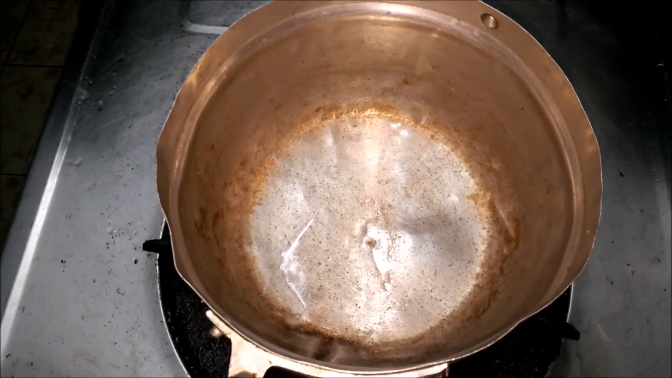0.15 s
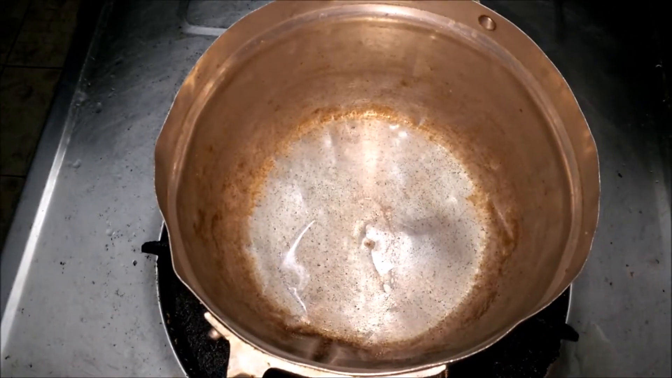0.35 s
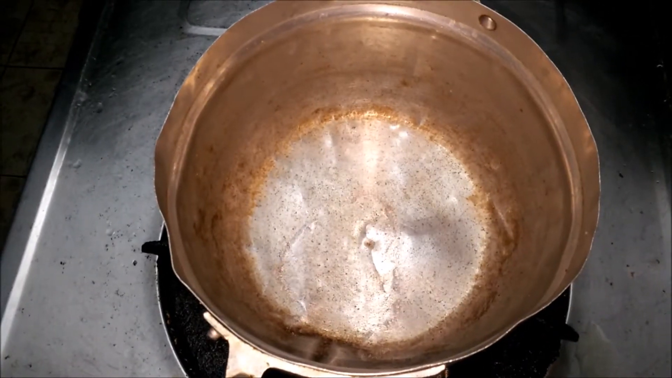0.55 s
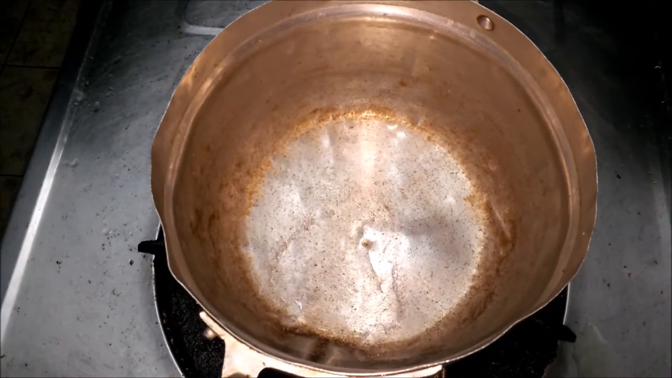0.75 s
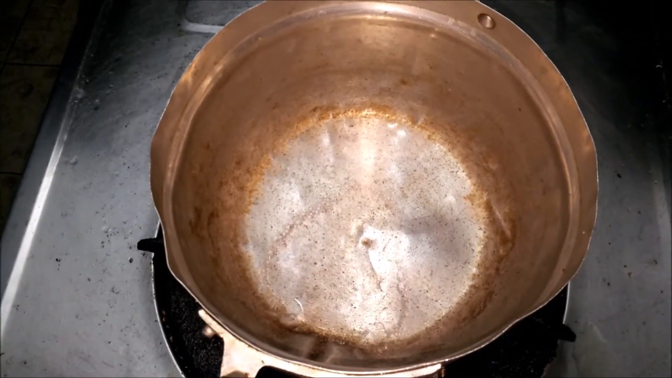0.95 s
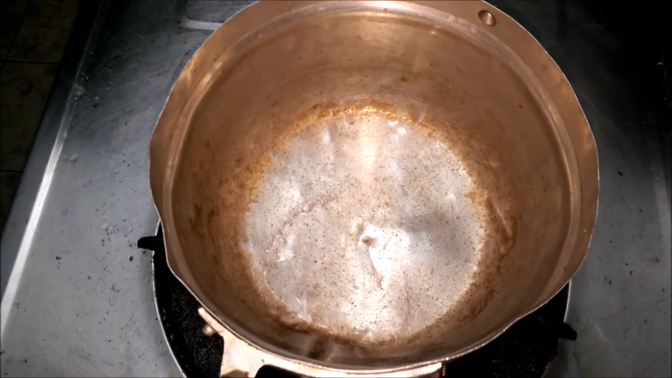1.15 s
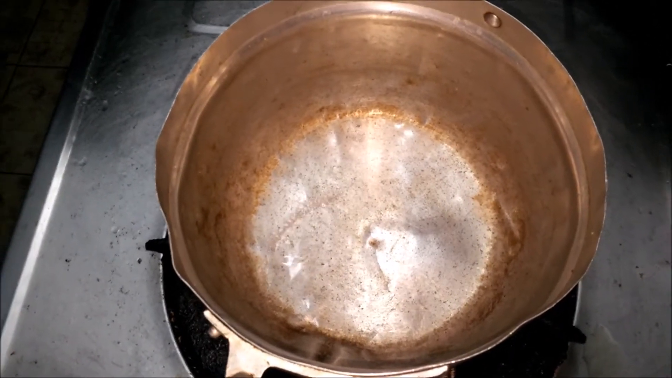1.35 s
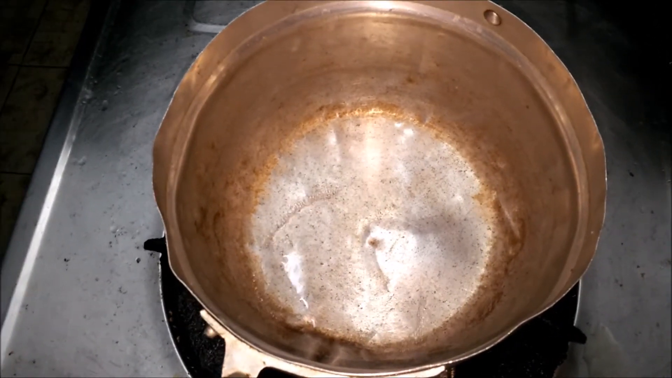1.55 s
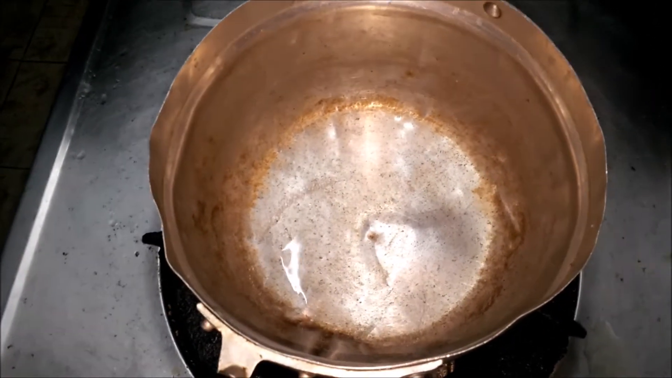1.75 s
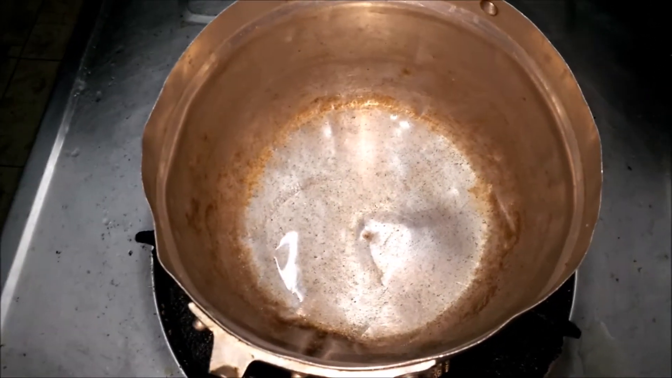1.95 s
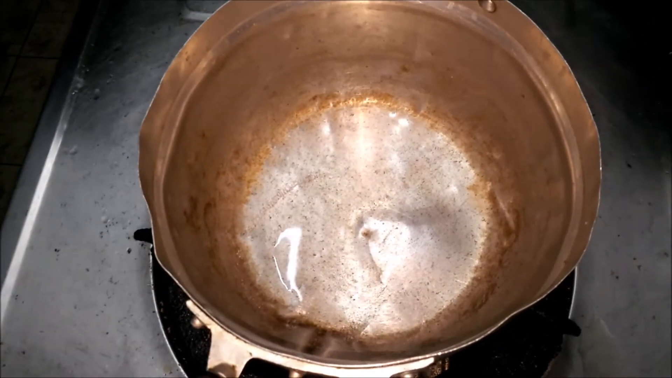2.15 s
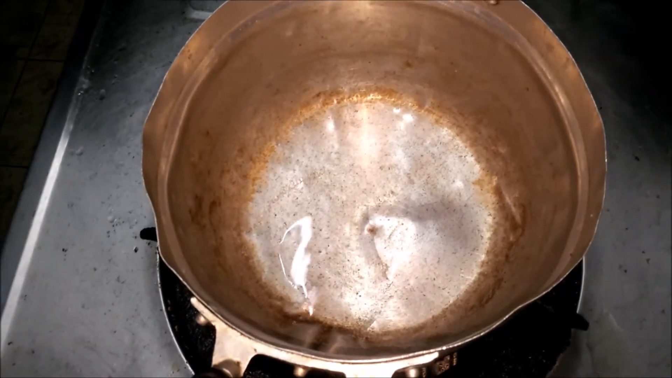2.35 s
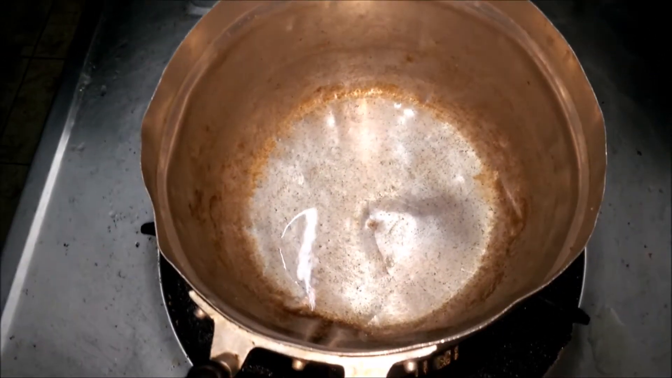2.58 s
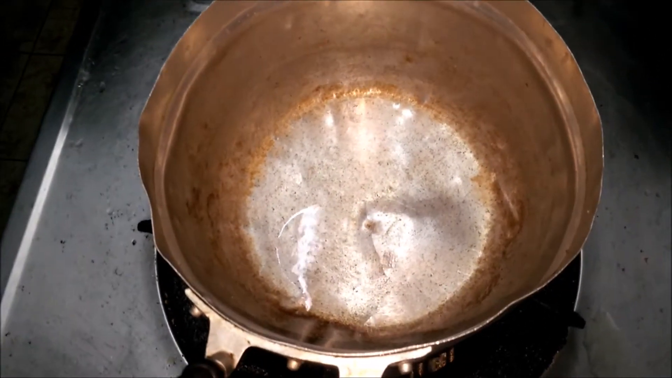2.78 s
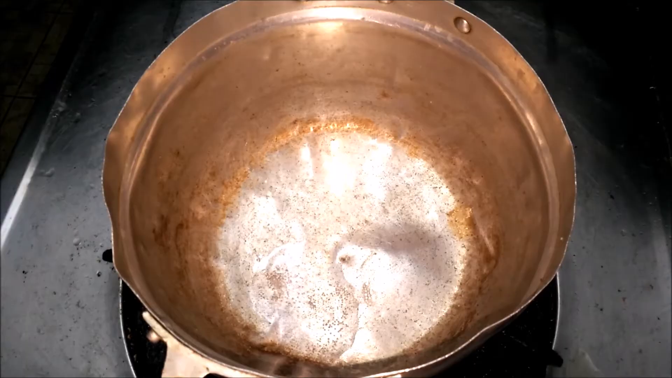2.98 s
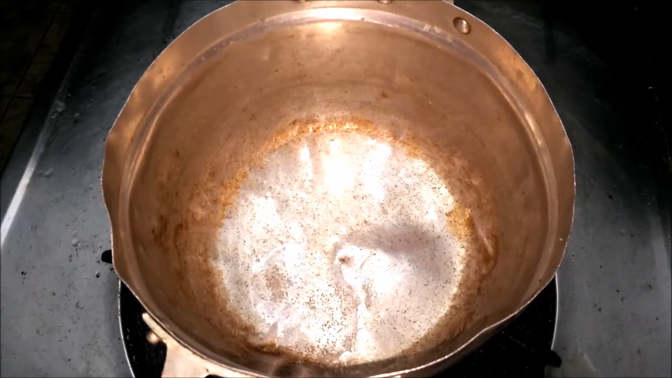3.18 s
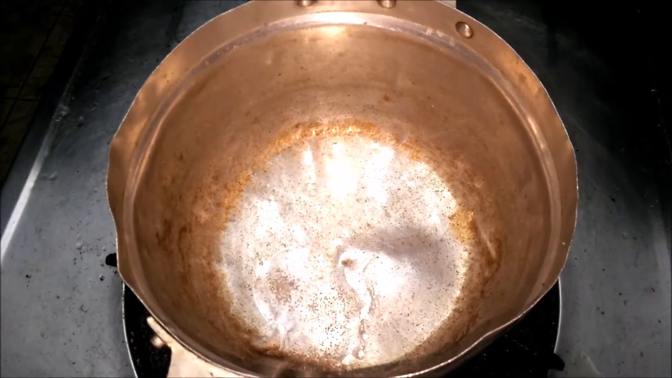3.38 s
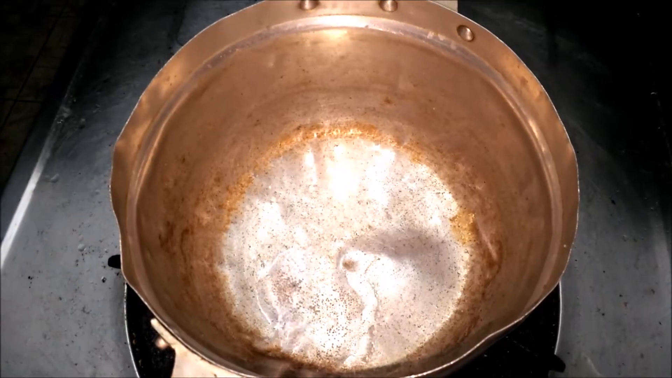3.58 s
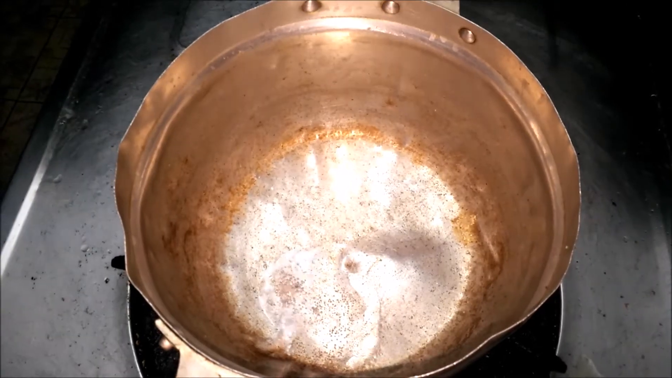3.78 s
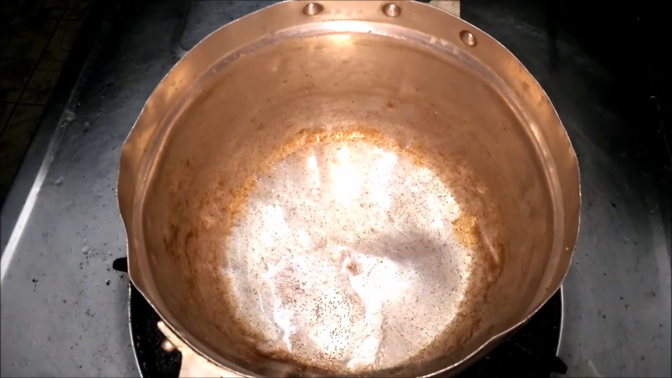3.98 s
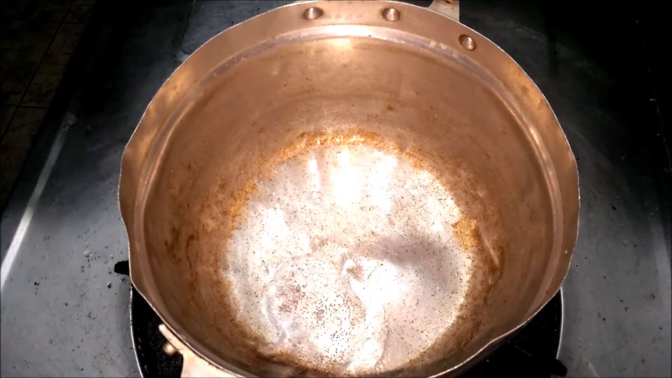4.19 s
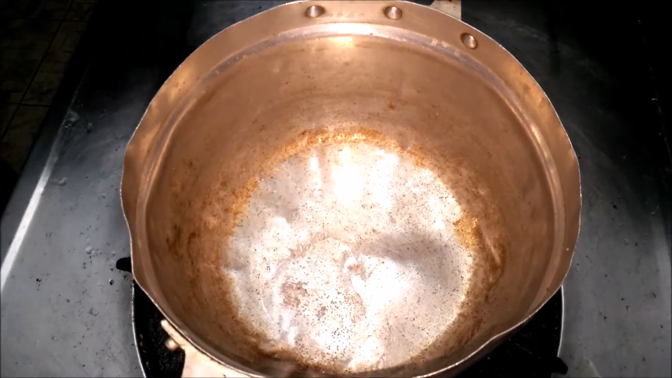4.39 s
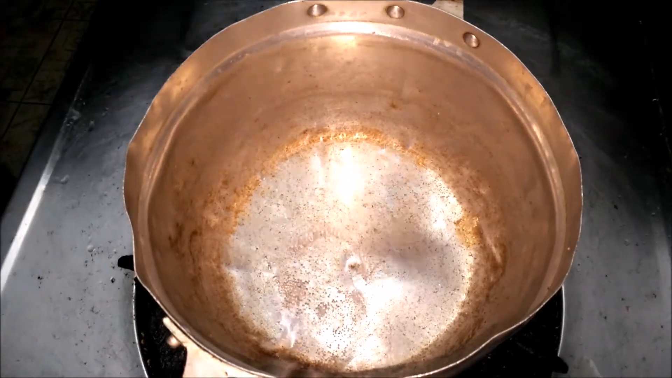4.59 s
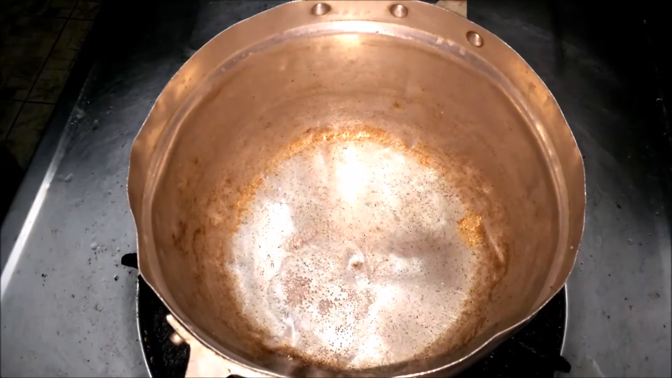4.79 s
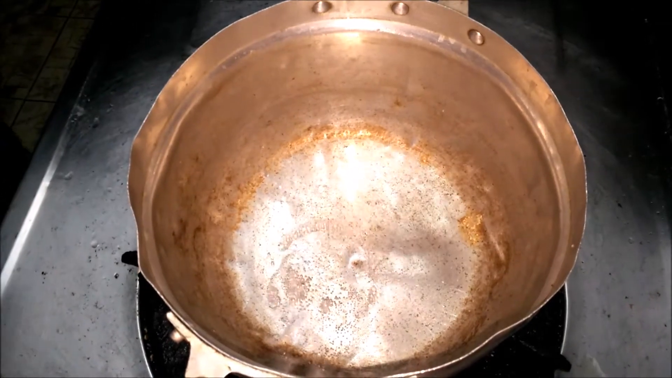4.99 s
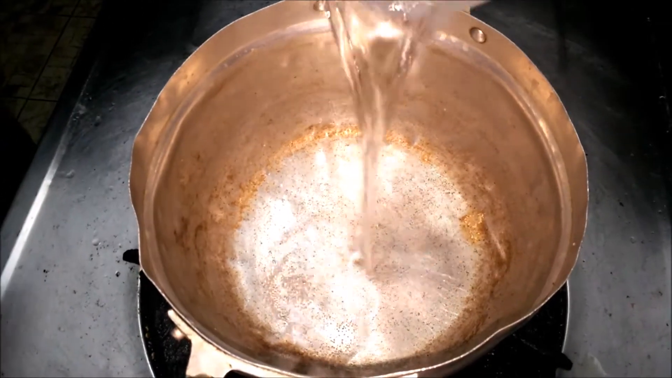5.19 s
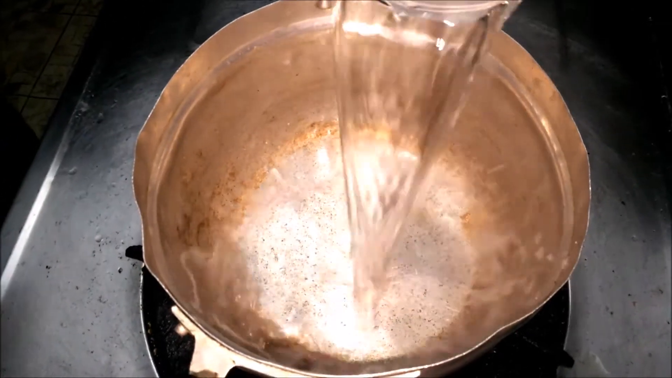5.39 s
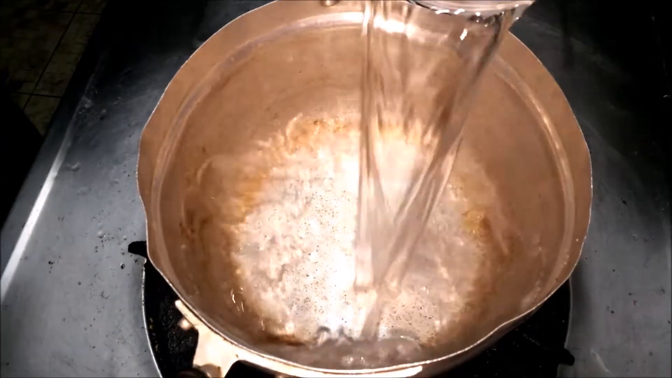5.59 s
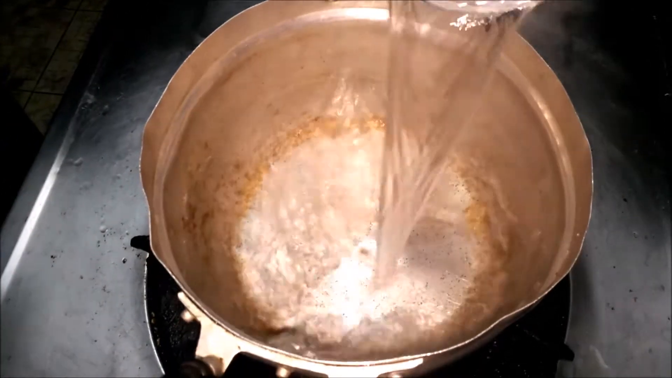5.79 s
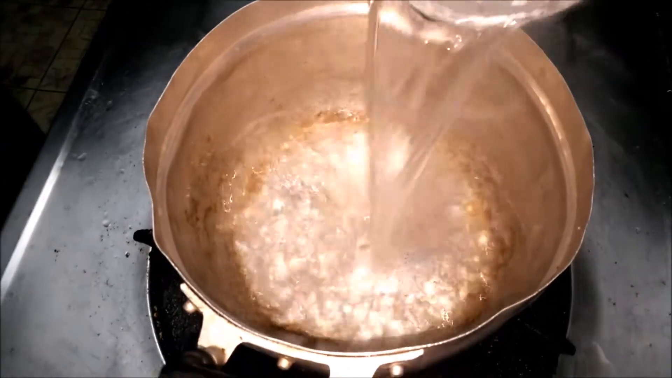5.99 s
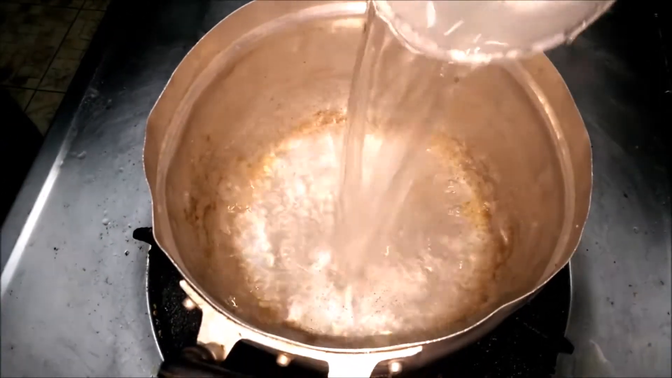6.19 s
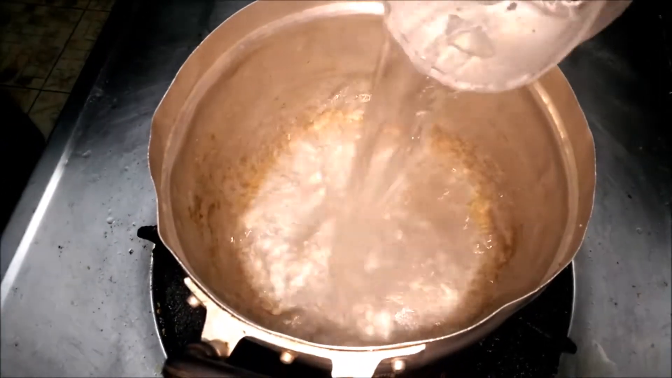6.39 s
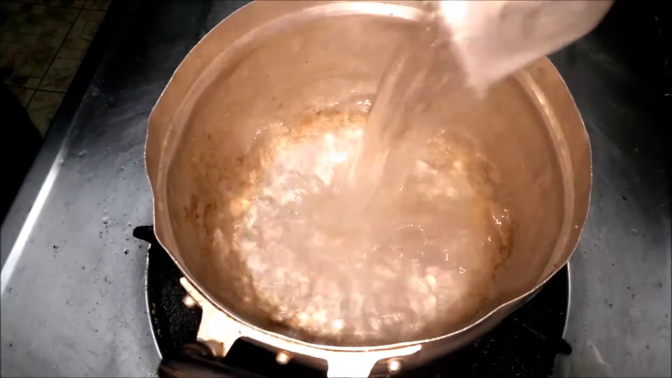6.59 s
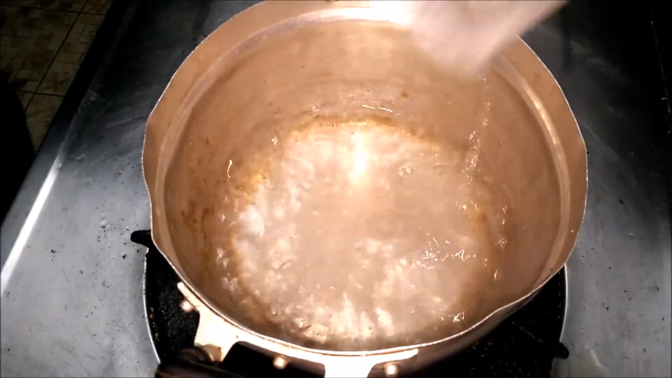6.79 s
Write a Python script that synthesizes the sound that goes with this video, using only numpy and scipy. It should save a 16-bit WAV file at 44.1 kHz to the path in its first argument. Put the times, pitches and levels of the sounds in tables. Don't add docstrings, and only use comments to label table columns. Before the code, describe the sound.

Sharp oil pops over fine sizzling in a thin pot, a quiet lull, then a sudden overloaded blast of steam that settles into bubbling.

```python
import sys
import numpy as np
from scipy import signal
from scipy.fft import rfft, irfft, next_fast_len
from scipy.io import wavfile
from scipy.ndimage import uniform_filter1d, map_coordinates

SR = 44100
rng = np.random.default_rng(int(sys.argv[2]) if len(sys.argv) > 2 else 0)


def amp(db):
    return 10 ** (np.asarray(db, float) / 20)


def write(x):
    x = np.atleast_2d(x).T
    wavfile.write(sys.argv[1], SR, np.round(np.clip(x, -1, 1) * 32767).astype(np.int16))


N = 301930
GRID = 32

# time in seconds, level in dB.
FLAME = [(0, -85), (1.7, -84), (2.1, -87), (3.4, -80), (4.5, -75), (4.75, -80), (5.2, -77), (6.1, -84),
         (6.85, -69)]
# time in seconds, peak level in dB.
GUSTS = [(0, -87), (.6, -89), (1.06, -92), (1.31, -93), (1.88, -94), (3.48, -88), (4.18, -85), (4.61, -84),
         (4.99, -84), (6.53, -77), (6.85, -79)]
# time in seconds, level in dB.
BLAST = [
    (5.22, -95),
    (5.232, -61),
    (5.45, -51),
    (5.64, -54),
    (5.8, -66),
    (5.95, -90),
]
STILL_DB, GUST_RISE_S, GUST_FALL_S, BLAST_DRAUGHT_DB = -104, .12, .1, -4.5
# start in seconds, peak in dB, pitch in Hz, 60 dB decay in seconds.
KNOCKS = [
    (3.965, -56, 260, .08),
    (3.96, -41, 584, 0.056),
    (4.05, -50, 300, 0.066),
    (4.14, -62, 88, .08),
    (4.19, -60, 90, .08),
    (4.98, -57, 110, 0.052),
]

# start in seconds, peak in dB, pitch in Hz, 60 dB decay in seconds.
BUBBLES = [(5.229, -23, 622, 0.05), (5.258, -24, 640, 0.06), (6.06, -35, 1470, 0.03), (5.85, -42, 660, .06),
           (6.055, -44, 680, .07), (6.09, -47, 620, .07), (6.13, -44, 1420, .04), (6.175, -39, 1550, .04),
           (6.3, -25.5, 3020, 0.019), (6.327, -30, 1500, 0.027), (6.33, -36, 2600, .03),
           (6.347, -39, 1440, .04), (6.405, -44, 3400, 0.052), (6.432, -49, 1900, 0.034),
           (6.458, -35, 2950, .03), (6.505, -42, 718, 0.056), (6.624, -44, 2690, 0.023),
           (6.657, -39, 3580, 0.028), (6.765, -39, 690, 0.041), (6.835, -32, 3480, 0.025)]
# start in seconds, peak in dB.
SPLASHES = [(3.8277, -28), (6.3521, -29), (6.3537, -28), (6.4364, -22), (6.4432, -26), (6.4451, -29),
            (6.5672, -25), (6.5885, -27), (6.606, -29), (6.688, -25), (6.6935, -26), (6.7075, -22),
            (6.719, -23), (6.75, -17.5), (6.7585, -18), (6.7665, -20), (6.8148, -13), (6.8175, -17),
            (6.826, -19), (6.8408, -9), (6.8435, -15)]
SPLASH_HZ, SPLASH_WIDTH_HZ, SPLASH_T60_S, SPLASH_RISE_S = 8000, 2000, .018, .0005

# start in seconds, peak in dB, low thud in dB, middle crack in dB, left-right in dB.
POPS = [(0.005, -14, -27, -24, -8), (0.0084, -20, -25, -19, -5), (0.0392, -10, -14, -12, -4),
        (0.0704, -15, -23, -15, -14), (0.2904, -16, -22, -20, -7), (0.306, -14.5, -16, -12, -5),
        (0.3853, -9, -21, -16, -11), (0.4254, -4.5, -24, -24, -3), (0.4305, -15, -12, -19, 0),
        (0.5511, -11.5, -20, -19, -5), (0.6285, -22, -15, -10, 3), (0.8767, -22, -15, -15, 1),
        (0.9135, -11.5, -26, -26, -3), (0.9187, -11, -28, -26, -4), (0.9475, -22, -26, -26, 4),
        (0.9937, -19, -25, -25, -7), (1.0159, -17, -21, -21, 1), (1.0178, -4.5, -30, -23, 7),
        (1.3475, -13, -17, -5, 3), (1.3982, -27, -10, -9, -1), (1.5422, -12, -26, -24, -4),
        (1.8815, -12, -16, -25, -17), (1.9139, -12, -27, -31, -8), (1.9452, -18, -24, -26, -11),
        (1.9674, -22, -24, -33, -4), (1.988, -16, -32, -38, -11), (2.2108, -23, -24, -35, -6),
        (2.3658, -11, -33, -26, -7), (2.4176, -20, -34, -18, -4)]
# start in seconds, peak in dB.
SPITS = [(0.1216, -21), (0.215, -25), (0.4585, -21), (0.5384, -20), (0.558, -20), (.675, -24),
         (1.0082, -23), (1.0809, -24), (1.5102, -31), (1.5279, -30), (1.8115, -31), (1.8329, -26),
         (1.9234, -23), (2.1533, -26), (2.197, -32), (2.2874, -23), (2.3055, -29), (2.3502, -35),
         (2.3636, -28), (2.5202, -34)]
SPIT_THUD_DB, SPIT_PAN_DB = -24, -5
SNAP_DB, SNAP_PER_DB, SNAP_DB_PER_S = -13, -.25, 3.2
# delay in seconds, level in dB.
ECHOES = [
    (.002, -9),
    (.0032, -16),
    (.0048, -18),
]
AFTER_DB, AFTER_STEAM_DB, AFTER_BRIGHT_DB, AFTER_RISE_S, AFTER_FALL_S = -30.5, -28, 1.5, .012, .16

# time in seconds, boiling in dB, steam in dB, fineness of the spray in dB.
FRY = [(0, -35, -57, -7), (.27, -40, -59, -5), (.87, -42, -59, -6), (1.1, -40, -58, -5),
       (1.34, -45, -62, -6), (1.87, -45, -62, -4), (2.3, -47.5, -65, -3), (2.6, -58, -67, -8),
       (3.12, -56, -65, -7), (3.55, -49.5, -57, -4), (3.9, -42, -57, -5), (4.1, -39.5, -57.5, -5),
       (4.43, -43, -58, -4.5), (4.85, -41, -59, -9), (5.2, -43, -58, -6), (6.05, -47, -58, -5),
       (6.3, -49, -58, -11), (6.68, -58, -61, -9)]
# peak in seconds, boiling in dB, steam in dB,
# 10 dB rise in seconds, 10 dB fall in seconds.
SURGES = [(.68, -40, -62, .1, .14), (1.39, -39.5, -60, .04, .14), (1.835, -42, -62, .02, .03),
          (2.7, -49, -67, .03, .1), (2.93, -50, -66, .06, .09), (3.025, -45, -66, .03, .02),
          (3.28, -40, -50, .08, .1), (3.41, -47, -59, .04, .1), (3.81, -44, -64, .08, .06),
          (3.95, -48, -57, .2, .4), (4.497, -39, -45, .04, .035), (4.68, -39, -62, .2, .07),
          (5.7, -40, -33.5, .3, .07), (5.235, -21.5, -55, .003, .022), (6.01, -26.5, -48, .06, .085),
          (6.348, -40, -50, .09, .05), (6.415, -44, -60, .008, .04), (6.44, -38.5, -52, .015, .14),
          (6.59, -37, -60, .05, .05), (6.69, -34, -52, .004, .16), (6.765, -29, -53, .06, .04),
          (6.85, -27, -54, .04, .05)]
# time in seconds, boiling in dB, steam in dB.
POUR = [
    (5.225, -70, -80),
    (5.24, -25, -51),
    (5.27, -25.5, -47),
    (5.305, -12.5, -37),
    (5.36, -13.5, -28),
    (5.76, -13.5, -28.5),
    (5.875, -29, -45),
    (5.95, -37, -45),
    (6.2, -70, -62),
]
# time in seconds, level in dB under steam.
FROTH = [(0, -4), (2.9, -5), (3.15, 2), (3.55, -7), (3.95, -1), (5.2, -1), (6.05, -2), (6.4, -6),
         (6.85, -7)]
# time in seconds, lift of its top in dB.
SHEEN = [(6.36, 0), (6.41, 6), (6.5, 4), (6.6, -2), (6.675, -5), (6.7, 2), (6.85, 2)]
# time in seconds, level in dB over the fizz.
FOCUS = [(0, -9), (2.6, -9), (3.6, -5), (4.0, 0), (4.5, 0), (4.8, 4), (5.2, 3), (5.3, -12), (6.0, -8),
         (6.5, 0), (6.85, 1)]
FOCUS_HZ, FOCUS_WIDTH_HZ = 8050, 1300
# time in seconds, left-right in dB.
DRIFT = [(0, -3), (1.2, 3.5), (1.75, 2.5), (1.91, 8), (2.4, 3), (3.09, 5.5), (3.53, -7), (3.97, 1.5),
         (4.48, -.5), (4.71, 9), (5.0, 15.5), (5.19, 2.5), (6.14, 0), (6.85, 5)]
STEAM_PAN_DB, STEAM_FOLLOWS = 5.3, -.15
POUR_BRIGHT_DB = -8.5
SURGE_HUM_DB, POUR_HUM_DB = -8, -14.5
PUFF_HZ = 3600

# frequency in Hz, level in dB per Hz.
FIZZ_COLOUR = [(2650, -64), (4500, -15), (6290, -9.5), (7260, -3), (7510, -1), (8200, 1.5), (10100, -4),
               (13400, -10), (13900, -10.5), (14600, -24)]
STEAM_COLOUR = [(500, -29), (1100, -10.5), (1800, 0), (3000, 0), (3800, 0.5), (5000, -14.5), (8000, -47.5)]
HUM_COLOUR = [(200, -25.5), (420, -18), (560, -10), (900, -7.5), (1300, -11), (2000, -55.5)]
RUMBLE_COLOUR = [(40, -49), (90, -16.5), (150, -5), (280, -2), (450, -7), (600, -33), (1000, -81)]
DRAUGHT_COLOUR = [(15, -22), (30, 7), (70, 9), (120, 12), (200, -60)]
# frequency in Hz, width in Hz, lift in dB.
POT = [(640, 210, 11), (1385, 170, 11.5), (2162, 240, 3), (2814, 690, 3), (3740, 300, 3.5),
       (4720, 500, 0.5), (5420, 260, 2.5), (5970, 260, 2.5), (6420, 220, 2.5)]
# frequency in Hz, width in Hz, gain in dB.
NULLS = [
    (3220, 120, -2.5),
    (4300, 200, -3),
]
# frequency in Hz, left-right in dB.
PORTS = [(60, -23), (92, -8), (140, 3), (210, -9), (320, 5), (500, -8), (760, -1), (1150, -5), (1760, -5),
         (2680, -13), (4090, -7.5), (6240, 7.5), (9510, 6), (14500, -4.5)]
# frequency in Hz, left-right correlation.
ALIKE = [(60, 0.39), (150, 0.55), (370, 0.65), (600, .75), (930, 0.8), (1400, .6), (2330, 0.15),
         (5810, 0.2), (14500, -0.05)]
LAG = 5


def unit(x):
    return x / np.sqrt(np.mean(x ** 2) + 1e-20)


def along(points, hz):
    f, v = np.transpose(points)
    return np.interp(np.log(hz + 1), np.log(f + 1), v)


def coloured(points, hz):
    return amp(along(points, hz))


def below(edge, slope, hz):
    return 1 / (1 + (hz / edge) ** slope)


def above(edge, slope, hz):
    return 1 / (1 + (edge / (hz + 1)) ** slope)


def around(centre, width, hz):
    return 1 / (1 + (2 * (hz - centre) / width) ** 4)


def lifted(modes, hz):
    return amp(sum(db / (1 + (2 * (hz - c) / w) ** 2) for c, w, db in modes))


def pot(hz):
    return lifted(POT, hz)


def filtered(x, gain, size=8192):
    cepstrum = irfft(np.log(gain(np.fft.rfftfreq(size, 1 / SR)) + 1e-6), size)
    cepstrum[..., 1:size // 2] *= 2
    cepstrum[..., size // 2 + 1:] = 0
    response = irfft(np.exp(rfft(cepstrum)), size)
    m = next_fast_len(x.shape[-1] + size)
    return irfft(rfft(x, m) * rfft(response, m), m)[..., :N]


def peaked(gain):
    click = filtered(1. * (np.arange(SR // 20) == 0), gain)[:SR // 20]
    return click / np.abs(click).max()


def grid_s():
    return np.arange(0, N + GRID, GRID) / SR


def curves(rows):
    s, *cols = np.transpose(rows)
    return [np.interp(grid_s(), s, c) for c in cols]


def fine(*controls):
    return [np.interp(np.arange(N) / SR, grid_s(), c) for c in controls]


def wobble(rate):
    knots = rng.standard_normal(int(N * rate / SR) + 4)
    return fine(map_coordinates(knots, [grid_s() * rate]))[0]


def swell(s, db, rise_s, fall_s):
    t = grid_s() - s
    return db - 10 * np.maximum(-t / max(rise_s, 1 / SR), t / fall_s)


def summed(*levels_db):
    return 10 * np.log10(sum(amp(db) ** 2 for db in levels_db) + 1e-20)


def sides(pan_db):
    return amp(np.array([pan_db / 2, -pan_db / 2]))


def ports(direct, apart):
    m = next_fast_len(N)
    hz = np.fft.rfftfreq(m, 1 / SR)
    share = np.clip(along(ALIKE, hz), 0, 1)
    late = np.exp(-1j * np.pi * hz * LAG / SR * np.array([[1], [-1]]))
    spectrum = rfft(direct, m) * late * share ** .5 + rfft(apart, m) * (1 - share) ** .5
    return irfft(spectrum, m)[:, :N]


def hiss(spiky_db, patchy_db):
    size = uniform_filter1d(amp(spiky_db * rng.exponential(size=N)), size=12)
    z = signal.stft(size * rng.standard_normal((3, N)), nperseg=256)[2]
    patches = uniform_filter1d(rng.standard_normal(z.shape[1:]), size=8, axis=0)
    patches = unit(uniform_filter1d(patches, size=12, axis=1))
    a = signal.istft(z * amp(patchy_db * patches), nperseg=256)[1][:, :N]
    return ports(a[0], a[1:])


def rings(table, rise, rough=0):
    out, t = np.zeros(N + SR), np.arange(SR // 12) / SR
    for s, db, hz, t60 in table:
        phase = 2 * np.pi * hz * (t + rise * t * t / t60)
        phase += rough * np.cumsum(rng.standard_normal(len(t)))
        envelope = amp(db - 60 * t / t60) * (1 - np.exp(-t / 0.0016))
        out[round(s * SR):][:len(t)] += envelope * np.sin(phase)
    return out[:N]


def flame():
    blast_db, = curves(BLAST)
    roar_db = summed(*curves(FLAME), blast_db)
    gusts_db = [swell(s, db, GUST_RISE_S, GUST_FALL_S) for s, db in GUSTS]
    draught_db = summed(STILL_DB, blast_db + BLAST_DRAUGHT_DB, *gusts_db)
    roar_db, draught_db = fine(roar_db, draught_db)
    shared, *apart = rng.standard_normal((3, N))
    roar = ports(shared, np.array(apart))
    rumble = unit(filtered(roar, lambda hz: coloured(RUMBLE_COLOUR, hz)))
    deep = unit(filtered(rng.standard_normal((2, N)), lambda hz: coloured(DRAUGHT_COLOUR, hz)))
    rumble = amp(roar_db + 3.5 + 1.7 * wobble(11)) * rumble
    return rumble + amp(draught_db - 1 + 5 * wobble(11)) * deep


def knocks():
    return rings(KNOCKS, rise=0)


def gurgle(count=110):
    u = rng.random((count, 3))
    start_s, peak_db = 5.86 + .98 * u[:, 0], 6 - 14 * u[:, 2]
    hz = 1300 * 3.24 ** u[:, 1]
    tones = rings(np.c_[start_s, peak_db, hz, 45 / hz], rise=0.091)
    return ports(tones, tones * np.ones((2, 1)))


def bubbles():
    tones = rings(BUBBLES, rise=0.05, rough=.05)
    return ports(tones, tones * np.ones((2, 1)))


def splashes():
    out, t = np.zeros((2, N + SR)), np.arange(SR // 40) / SR
    shape = amp(-60 * t / SPLASH_T60_S) * (1 - np.exp(-t / SPLASH_RISE_S))
    band = peaked(lambda hz: around(SPLASH_HZ, SPLASH_WIDTH_HZ, hz))
    for s, db in SPLASHES:
        ring = signal.fftconvolve(shape * rng.standard_normal((2, len(t))), band[None], axes=1)
        ring /= np.abs(ring).max(axis=1, keepdims=True)
        ring *= amp(db + 2.5) * sides(-0.5)[:, None]
        out[:, round(s * SR):][:, :ring.shape[1]] += ring
    return out[:, :N]


def droplets():
    oil = POPS + [(s, db, SPIT_THUD_DB, SPIT_THUD_DB, SPIT_PAN_DB) for s, db in SPITS]
    return [(s, db, thud_db, crack_db, SNAP_DB + SNAP_PER_DB * db + SNAP_DB_PER_S * s, pan_db)
            for s, db, thud_db, crack_db, pan_db in oil]


def pops():
    out, t = np.zeros((2, N + SR)), np.arange(SR // 20) / SR
    core = peaked(lambda hz: coloured(FIZZ_COLOUR, hz) * below(10500, 12, hz))
    thud = peaked(lambda hz: pot(hz) ** .6 * above(700, 4, hz) * below(2700, 6, hz))
    middle = peaked(lambda hz: pot(hz) * above(2900, 6, hz) * below(6000, 8, hz))
    snap = peaked(lambda hz: above(10500, 12, hz) * below(14300, 40, hz))
    for s, db, thud_db, crack_db, snap_db, pan_db in droplets():
        noise = rng.standard_normal((3, len(t)))
        crack = (t == 0) + .12 * noise[0] * amp(-60 * t / .004)
        pair = np.array([np.pad(crack, (LAG, 0))[:len(t)], crack])
        ears = sides(pan_db - 4.5)
        pair *= (ears / ears.mean())[:, None]
        pair += noise[1:] * (amp(-23.5 - 60 * t / .018) + amp(-33 - 60 * t / .08))
        for lag, echo_db in ECHOES:
            k = round(lag * SR * rng.uniform(.92, 1.08))
            echo = amp(echo_db + rng.normal(0, 2, (2, 1))) * rng.choice([-1, 1], (2, 1))
            pair[:, k:] += echo * crack[:-k]
        colour = amp(db + 3) * core + amp(db + thud_db - 9.5) * thud
        colour += amp(db + crack_db + 1.5) * middle + amp(db + snap_db + 3.6) * snap
        burst = signal.fftconvolve(pair, colour[None], axes=1)
        start = round(s * SR) - 8
        out[:, start:start + burst.shape[1]] += burst
    return out[:, :N]


def boiling():
    fry_db, wet_db, bright_db = curves(FRY)
    pour_db, flash_db = curves(POUR)
    froth_db, = curves(FROTH)
    sheen_db, = curves(SHEEN)
    surge_db = summed(*[swell(s, db, up, down) for s, db, _, up, down in SURGES])
    puff_db = summed(*[swell(s, db, up, down) for s, _, db, up, down in SURGES])
    spray_db = summed(*[swell(s, db + AFTER_DB, AFTER_RISE_S, AFTER_FALL_S) for s, db, *_ in POPS])
    mist_db = summed(*[swell(s, db + crack_db + AFTER_STEAM_DB - 8.5, AFTER_RISE_S, AFTER_FALL_S)
                       for s, db, _, crack_db, _ in POPS])
    fizz_db = summed(fry_db, surge_db, spray_db, pour_db)
    top_db = summed(fry_db, surge_db, spray_db + AFTER_BRIGHT_DB) + bright_db + sheen_db
    top_db = summed(top_db, pour_db + POUR_BRIGHT_DB)
    steam_db = summed(wet_db, mist_db, flash_db)
    hum_db = summed(wet_db + froth_db, puff_db + SURGE_HUM_DB, flash_db + POUR_HUM_DB)
    return fine(fizz_db, top_db, steam_db, puff_db, hum_db)


def sizzle():
    fizz_db, top_db, steam_db, puff_db, hum_db = boiling()
    fizz_pan_db, = fine(*curves(DRIFT))
    steam_sides = sides(STEAM_PAN_DB + STEAM_FOLLOWS * fizz_pan_db + 1.5 * wobble(2))
    flutter_db = 0.81 * wobble(35) + 0.3 * wobble(90)

    spray = hiss(spiky_db=3, patchy_db=1)
    core = unit(filtered(spray, lambda hz: coloured(FIZZ_COLOUR, hz) * below(10500, 24, hz)))
    sung = unit(filtered(np.roll(spray, SR, axis=1), lambda hz: around(FOCUS_HZ, FOCUS_WIDTH_HZ, hz)))
    focus = amp(fine(*curves(FOCUS))[0])
    core = (core + focus * sung) / np.sqrt(1 + focus ** 2)
    top = unit(filtered(spray, lambda hz: coloured(FIZZ_COLOUR, hz) * above(10500, 24, hz)))
    fizz = amp(3.5 + flutter_db) * (amp(fizz_db) * core + amp(top_db) * top) * sides(fizz_pan_db - 4)

    breathy = hiss(spiky_db=0, patchy_db=2.5)
    steam_gain = lambda hz: coloured(STEAM_COLOUR, hz) * pot(hz)
    rush = unit(filtered(breathy, steam_gain))
    puff = unit(filtered(np.roll(breathy, -SR, axis=1), lambda hz: steam_gain(hz) * below(PUFF_HZ, 4, hz)))
    steam = amp(steam_db + 4 + 0.33 * flutter_db) * (rush + amp(3.5) * gurgle()) * steam_sides
    steam += amp(puff_db + 6) * puff * steam_sides

    edge = lambda hz: pot(hz) * above(3900, 10, hz) * below(6800, 10, hz)
    shoulder = unit(filtered(hiss(spiky_db=3.5, patchy_db=2.8), edge))
    shoulder_db = 0.59 * summed(steam_db, puff_db - 3) + 0.76 * fizz_db + 6.6 + flutter_db
    steam += amp(shoulder_db) * shoulder

    hum = unit(filtered(np.roll(breathy, SR, axis=1), lambda hz: coloured(HUM_COLOUR, hz) * pot(hz)))
    return fizz + steam + amp(hum_db + 2.5 + 0.8 * wobble(25) + 1.1 * wobble(5)) * hum


def scene():
    pan = sizzle() + pops() + splashes() + bubbles()
    heard = lambda hz: sides(along(PORTS, hz)) * lifted(NULLS, hz) * above(260, 4, hz)
    return filtered(pan, heard) + flame() + knocks()


def low_pass(x):
    return signal.sosfilt(signal.butter(12, 14250, fs=SR, output="sos"), x)


def record(dry):
    squeezed = dry / (1 + abs(dry / 1.02) ** 5) ** (1 / 5)
    return low_pass(squeezed)


dry = scene()
out = record(dry)
write(out)
```